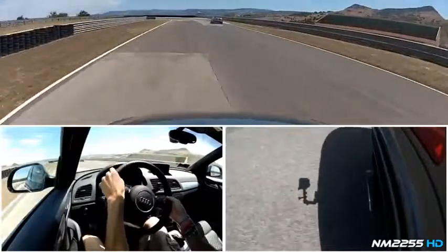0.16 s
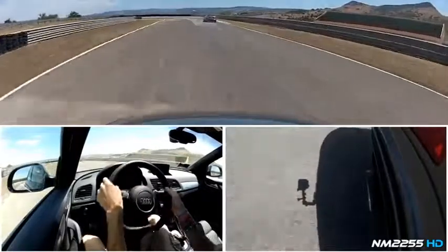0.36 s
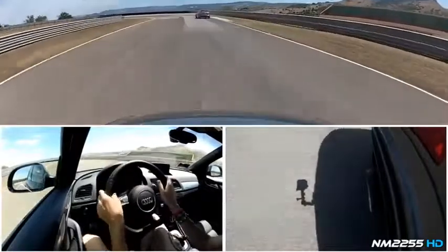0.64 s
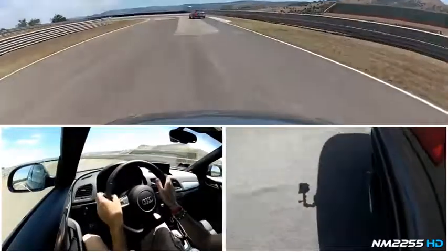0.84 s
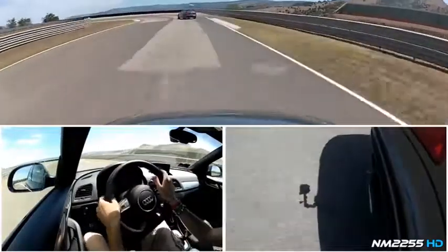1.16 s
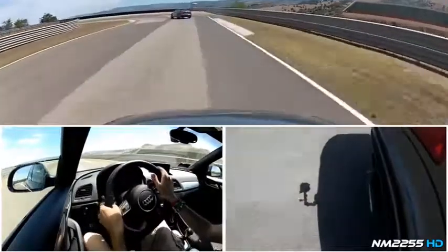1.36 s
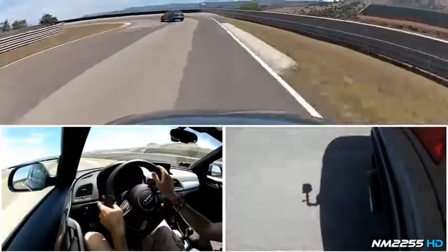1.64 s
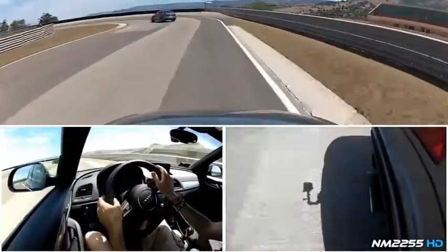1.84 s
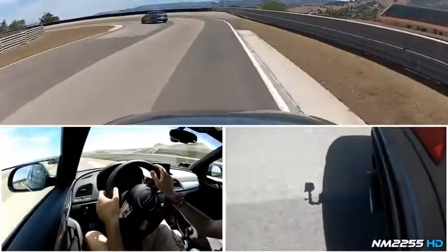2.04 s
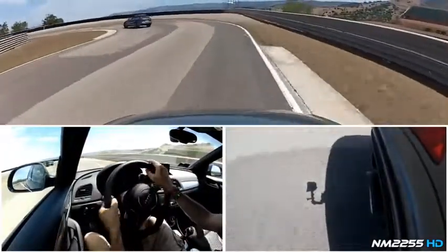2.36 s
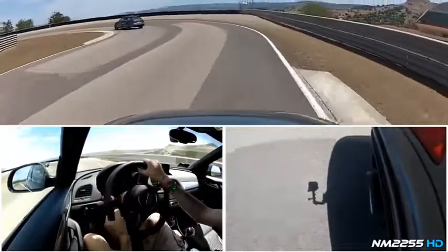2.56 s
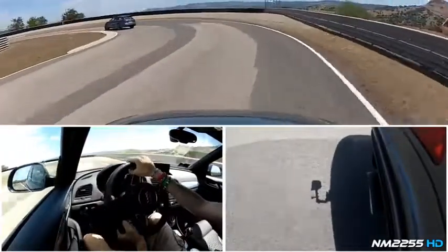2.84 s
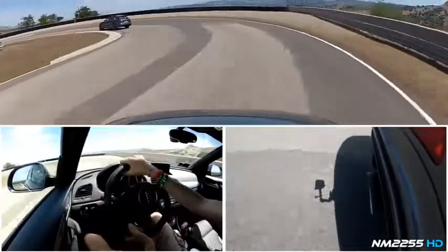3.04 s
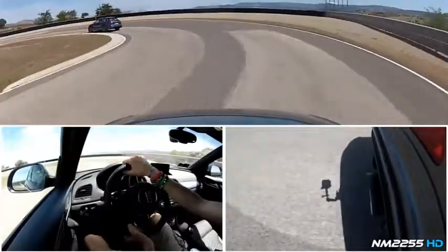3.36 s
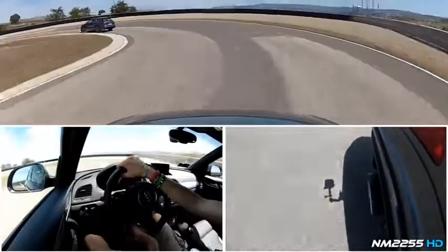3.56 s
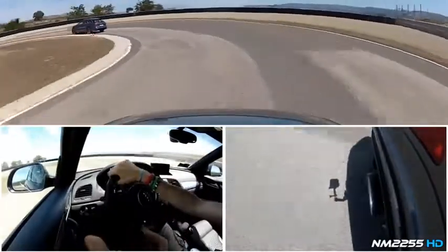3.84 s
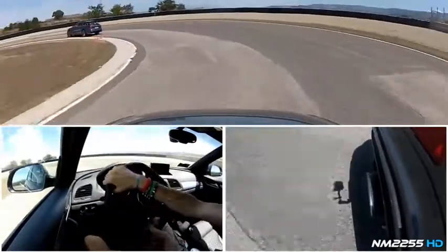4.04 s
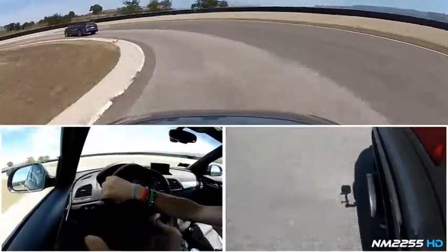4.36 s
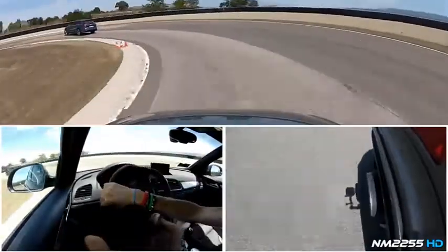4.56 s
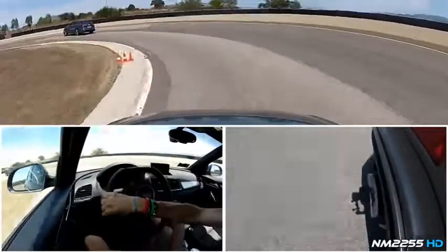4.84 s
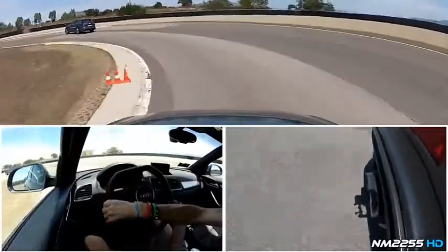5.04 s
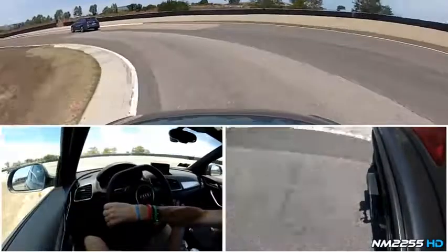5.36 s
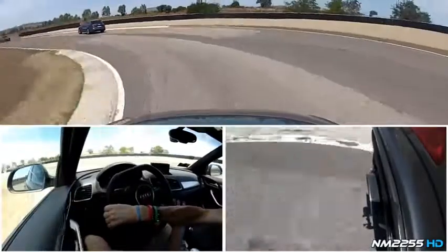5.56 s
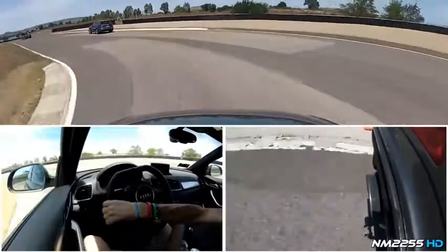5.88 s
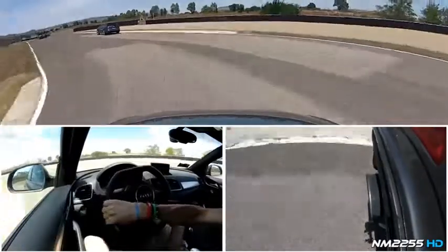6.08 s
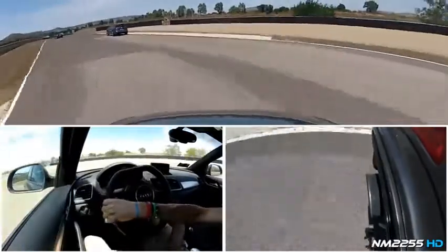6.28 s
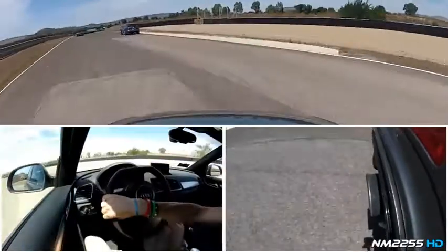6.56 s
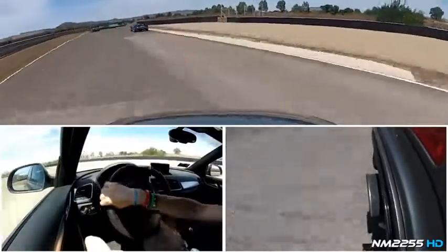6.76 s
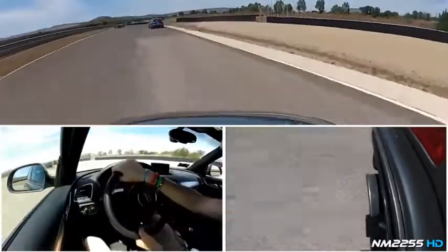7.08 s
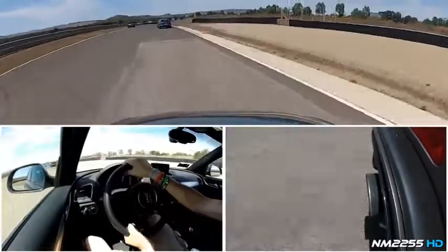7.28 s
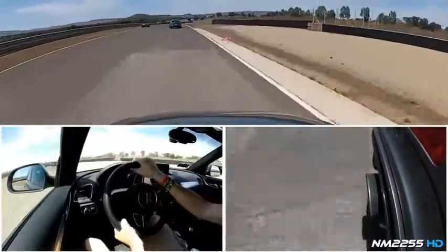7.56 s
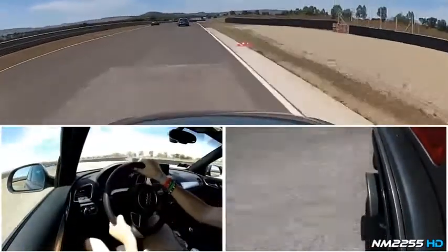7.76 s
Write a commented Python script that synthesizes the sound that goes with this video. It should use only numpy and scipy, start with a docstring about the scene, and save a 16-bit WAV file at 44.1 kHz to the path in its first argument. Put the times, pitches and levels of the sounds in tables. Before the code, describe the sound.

From beside the exhaust of a car lapping a track, a brief hard engine roar drops into uneven burbling. Two throttle blips follow with a cluster of sharp bangs. The car coasts more quietly over tyre noise and buffeting wind, then the throttle reopens with a faint turbo whistle and the engine pulls hard, growling and slowly rising in pitch.

```python
"""A turbocharged five-cylinder car at full throttle on a race track, heard near its tailpipe.
Then a lift, two downshift blips with exhaust pops, a coast through the corner and a hard pull out.
Firing pulses give the note, turbulent gas the rasp and hiss, fuel popping in the pipe the bangs.
Tyre roar and wind run underneath; gain control ducks the whole mix when the engine is loud."""
import sys
import numpy as np
from scipy import signal
from scipy.fft import rfft, irfft
from scipy.io import wavfile
from scipy.ndimage import uniform_filter1d, map_coordinates

SR = 44100
rng = np.random.default_rng(int(sys.argv[2]) if len(sys.argv) > 2 else 0)


def int16_out(signal):
    """Quantize to a 16-bit WAV file."""
    q = np.round(np.clip(np.atleast_2d(signal).T, -1, 1) * 32767)
    wavfile.write(sys.argv[1], SR, q.astype(np.int16))


N = 349266
TIME_S = np.arange(N) / SR
CYLINDERS, REFERENCE_FIRING_HZ = 5, 200

# tyres and airflow through braking, corner and exit: time_s, tyre_db, wind_db
ROAD_LEVELS = [(0, -46, -29), (1.25, -28.5, -30), (1.8, -29, -38), (3.1, -33, -38), (4.3, -33, -41.5),
               (5.1, -34, -32), (7.92, -31.5, -36)]
# tyre noise spectrum: freq_hz, gain_db
TYRE_SPECTRUM = [(100, 4), (230, 3.5), (340, 1), (500, -9), (650, -7), (1050, -3.5), (1330, -13.5),
                 (1800, -14.5), (2200, -22), (3400, -31.5), (5700, -37), (7200, -52), (14000, -81)]
# bodywork resonances: freq_hz, width_hz, gain_db
BODY_BANDS = [(265, 17, -0.5), (668, 38, -1), (917, 28, -3.5), (1800, 33, -33), (2950, 148, 9.5)]
# ragged burning after a lift: start_s, hold_s, level_db
BURBLE_SPELLS = [(0.814, .34, -25), (2.13, 0.16, -25), (2.7, 0.43, -30)]
# whole exhaust under burble: freq_hz, gain_db, t60_s
BURBLE_MODES = [(71.5, 2, 0.25), (196, -1, .04), (285, 0, 0.075), (420, -10.5, 0.08), (690, -12, 0.11),
                (843, -10.5, 0.13)]
# fuel popping in the pipe: start_s, boom_db, ring_db, crack_db
POP_EVENTS = [(0.592, -12, -18, -34), (0.951, -15, -20, -52), (.983, -19, -25, -56), (1.072, -24, -14, -48),
              (1.168, -16, -32, -52), (1.522, -21, -26, -52), (1.872, -21, -19, -40),
              (2.084, -26, -5.5, -32), (2.113, -16, -3, -29), (2.129, -10.5, -6, -38),
              (2.307, -12.5, -36, -45), (2.585, -3.5, -2, -50), (2.609, -6, -4.5, -31),
              (2.646, -6.5, -8.5, -60), (2.743, -7, -37, -37), (2.765, -11, -28, -46),
              (3.534, -22, -18.5, -37), (4.39, -23, -27, -54), (5.8, -22, -14.5, -50),
              (6.099, -17, -25, -42)]
# silencer boom: freq_hz, gain_db, t60_s
SILENCER_MODES = [(52, -2, 0.066), (81.5, 2.5, 0.085)]
# tailpipe ring: freq_hz, gain_db, t60_s
TAILPIPE_MODES = [(222, -6.5, 0.037), (393, -10, 0.093), (432, -7.5, 0.083), (890, -39, .02)]
# gas rasp spectrum: freq_hz, gain_db
RASP_SPECTRUM = [(100, -15.5), (250, -5.5), (330, -12), (430, 0.5), (570, 1.5), (690, -1), (1130, -2),
                 (1450, -11), (1800, -10), (2200, -27), (4000, -35), (7000, -40), (14000, -55)]
# gas hiss spectrum: freq_hz, gain_db
HISS_SPECTRUM = [(1500, -15), (2600, 10.5), (3300, 2), (3900, 9.5), (4800, 1.5), (5700, 1), (6900, -6),
                 (8600, -6), (9400, -14), (10500, -10), (12300, -11), (14800, -20)]
# outlet resonance: freq_hz, width_hz, gain_db
OUTLET_BANDS = [(760, 70, -1)]
# silencer chambers: freq_hz, width_hz, gain_db
CHAMBER_BANDS = [(400, 130, 7.5), (960, 450, -3), (1600, 110, -6.5), (2270, 90, -5.5)]
# steel shell resonances: freq_hz, width_hz, gain_db
SHELL_BANDS = [(2050, 310, 0), (2790, 49, 0.5), (3034, 170, 10.5), (3480, 100, 3), (3740, 59, -5),
               (3970, 100, 5), (5360, 99, -7)]
# turbo plumbing resonances: freq_hz, width_hz, gain_db
TURBO_BANDS = [(3880, 710, -14), (5530, 120, -8.5), (10700, 340, 1)]
# body of the note, unequal cylinders filling in between firing harmonics: cycle_order, gain_db
NOTE_ORDERS = [(1, -18), (2, -12.5), (3, -20), (4, -16), (5, 1), (6, -20), (7, -18.5), (8, -16), (9, -25)]
# steep front of each pulse: cycle_order, gain_db
PULSE_EDGE_ORDERS = [(10, -3.5), (11, -18), (12, -11), (13, -7), (14, -27), (15, -6), (16, -15.5), (17, -1),
                     (18, 6)]
# tailpipe resonance curve: freq_hz, gain_db
PIPE_RESPONSE = [(300, 10), (360, 4), (425, 15), (480, 6.5), (545, 3.5), (640, -11), (1200, -13)]
# engine speed: time_s, firing_hz
ENGINE_SPEED = [(0.0, 202.2), (0.53, 212.3), (0.7, 207), (0.87, 210), (1.03, 201.5), (1.2, 199.5),
                (1.5, 182.7), (1.88, 170), (2.1, 199.5), (2.37, 183), (2.59, 217), (2.8, 202), (3.15, 169),
                (3.75, 168.9), (4.55, 161), (5.5, 162.2), (6.25, 169.2), (6.68, 176.2), (6.9, 182),
                (7.08, 179.8), (7.92, 203.6)]
# throttle presses, and the engine note lingering after a lift; relative levels at the reference rate:
# start_s, rise_s, hold_s, fall_s, note_db, edge_db, rasp_db, hiss_db
ENGINE_SWELLS = [(-0.2, .1, .66, .14, -18, -16, -15, -43), (0.583, 0.063, 0.23, .1, -31, -31, -42.5, -84),
                 (1.855, 0.13, .1, 0.066, -34, -22.5, -21.5, -46.5),
                 (2.368, 0.13, 0.056, 0.11, -19.5, -14.5, -30.5, -55.5),
                 (2.67, .13, 0.11, 0.21, -30.5, -57, -56, -79),
                 (4.68, 0.13, 1.46, .2, -35, -35, -26.5, -44.5),
                 (5.704, 0.43, 0.088, 0.058, -37, -30, -17.5, -39.5),
                 (6.154, 0.36, 1.85, .1, -13, -10, -13.5, -42)]


def amp(db):
    """Decibels to gain."""
    return 10 ** (np.asarray(db) / 20)


def unit_rms(x):
    """Scale to rms 1."""
    return x / np.sqrt(np.mean(x ** 2) + 1e-20)


def curves(rows):
    """Table columns interpolated over time."""
    time_s, *columns = np.transpose(rows)
    return [np.interp(TIME_S, time_s, column) for column in columns]


def ramp(start_s, rise_s, hold_s, fall_s):
    """Trapezoid envelope, 0 to 1 to 0."""
    opening = (TIME_S - start_s) / rise_s
    closing = 1 - (TIME_S - start_s - rise_s - hold_s) / fall_s
    return np.clip(np.minimum(opening, closing), 0, 1)


def wander(rate_hz):
    """Smooth random drift, rms 1, rolled off above rate_hz."""
    white = rng.standard_normal(N // 32 + 2)
    hz = np.fft.rfftfreq(len(white), 32 / SR)
    slow = irfft(rfft(white) / (1 + (hz / rate_hz) ** 4), len(white))
    return unit_rms(np.interp(np.arange(N) / 32, np.arange(len(slow)), slow))


def response(spectrum, hz):
    """Gain of a spectrum at hz."""
    freq_hz, gain_db = np.transpose(spectrum)
    return amp(np.interp(np.log(hz + 1), np.log(freq_hz), gain_db))


def coloured(x, spectrum):
    """Filter by a spectrum, rolled off below its first point; rms 1."""
    hz = np.fft.rfftfreq(N, 1 / SR)
    low_cut = np.minimum(hz / spectrum[0][0], 1) ** 2
    return unit_rms(irfft(rfft(x) * response(spectrum, hz) * low_cut, N))


def resonances(x, bands):
    """Parallel band-pass resonators."""
    return sum(amp(db) * signal.lfilter(*signal.iirpeak(hz, hz / width_hz, fs=SR), x)
               for hz, width_hz, db in bands)


def ringing(modes):
    """Damped modes after one pressure kick."""
    t = np.arange(SR // 4) / SR
    return sum(amp(db - 60 * t / t60_s) * np.sin(2 * np.pi * hz * t) for hz, db, t60_s in modes)


def road_and_wind():
    """Tyres roar on coarse asphalt and stir the bodywork; eddies buffet the microphone."""
    tyre_db, wind_db = curves(ROAD_LEVELS)
    tyres = coloured(amp(0.76 * wander(12)) * rng.standard_normal(N), TYRE_SPECTRUM)
    tyres = unit_rms(tyres + resonances(tyres, BODY_BANDS))
    wind = coloured(rng.standard_normal(N),
                    spectrum=[(26, -2.5), (36, -1), (70, -5.5), (130, -5.5), (300, -15.5), (4000, -90)])
    gust_db = 1 + 3.6 * np.tanh(wander(9.5))
    return amp(tyre_db) * tyres + amp(wind_db + gust_db) * wind


def turbo_spool(peak_s=4.8, spread_s=0.53, peak_db=-55, pitch_hz=3080, width_hz=82):
    """The turbo draws air with a faint whistle as the throttle reopens."""
    whistle = unit_rms(resonances(rng.standard_normal(N), [(pitch_hz, width_hz, 0)]))
    return amp(peak_db) * np.exp(-((TIME_S - peak_s) / spread_s) ** 2) * whistle


def burble(cycles, rise_s=0.062, fall_s=0.12):
    """After a lift, charges burn unevenly and thump the exhaust, loping twice a cycle."""
    fired = np.diff(np.floor(CYLINDERS * cycles), prepend=0) > 0
    lope = np.cos(2 * np.pi * 2 * cycles)
    kicks = fired * (lope + rng.uniform(-1.93, 1, N))
    spells = sum(amp(db) * ramp(start_s, rise_s, hold_s, fall_s) for start_s, hold_s, db in BURBLE_SPELLS)
    return spells * unit_rms(signal.oaconvolve(kicks, ringing(BURBLE_MODES))[:N])


def pops(crack_rise_s=0.0012, crack_t60_s=0.031, crack_cutoff_hz=700):
    """Fuel pops in the pipe: a short crack, a tailpipe ring and a silencer boom."""
    out = np.zeros(N + SR)
    boom, ring = ringing(SILENCER_MODES), ringing(TAILPIPE_MODES)
    t = np.arange(len(boom)) / SR
    lowpass = signal.butter(1, crack_cutoff_hz, fs=SR)
    for start_s, boom_db, ring_db, crack_db in POP_EVENTS:
        grit = unit_rms(signal.lfilter(*lowpass, rng.standard_normal(len(t))))
        crack = amp(crack_db - 60 * t / crack_t60_s) * (1 - np.exp(-t / crack_rise_s)) * grit
        out[int(start_s * SR) + np.arange(len(t))] += amp(boom_db) * boom + amp(ring_db) * ring + crack
    return out[:N]


def gas_rush(cycles, firing_hz, rasp_db, hiss_db,
             buzz_from_hz=192, buzz_span_hz=2.2, roar_from_db=-24, whistle_from_db=-63):
    """Turbulent gas leaves in one puff per firing, one cylinder blowing harder than the rest."""
    puffs = 1 - 0.085 * np.cos(2 * np.pi * CYLINDERS * cycles) + 0.028 * np.cos(2 * np.pi * cycles)
    # growl: part of the turbulence recurs every cycle
    pattern = rng.standard_normal(1024)
    recurring = map_coordinates(pattern, [cycles % 1 * len(pattern)], order=3, mode="grid-wrap")
    flow = rng.standard_normal(N) + 0.67 * recurring
    rasp = coloured(puffs * amp(0.8 * wander(30)) * flow, RASP_SPECTRUM)
    # gentle flow sounds hollow, strong flow roars at the outlet
    strong = 1 / (1 + amp(2 * (roar_from_db - rasp_db)))
    roar = strong * resonances(rasp, OUTLET_BANDS) + (1 - strong) * resonances(rasp, CHAMBER_BANDS)
    buzz_gain = amp(3) / (1 + np.exp((buzz_from_hz - firing_hz) / buzz_span_hz))
    buzz = buzz_gain * resonances(rasp, SHELL_BANDS)
    hiss = coloured((1 + 1.6 * puffs) * amp(0.93 * wander(30)) * rng.standard_normal(N), HISS_SPECTRUM)
    # the turbo whistle comes in with the hiss, then blends into strong flow
    whistle_gain = (1.3 - 0.63 * strong) / (1 + amp(2 * (whistle_from_db - hiss_db)))
    whistle = whistle_gain * resonances(hiss, TURBO_BANDS)
    return amp(rasp_db - 1) * (rasp + roar + buzz) + amp(hiss_db + 6.5) * (hiss + whistle)


def order_tone(order, cycles, firing_waver, between_waver):
    """One engine order; firing harmonics and the orders between waver by separate depths."""
    waver, phase = (firing_waver, 0) if order % CYLINDERS == 0 else (between_waver, rng.random())
    return -np.sqrt(2) * (1 + waver * wander(28)) * np.cos(2 * np.pi * (order * cycles + phase))


def exhaust_note(cycles, firing_hz, note_db, edge_db, standing_wave_hz=497, half_width_hz=24):
    """Firing pulses as engine orders; the upper ones swell passing through the pipe resonance."""
    note = sum(amp(note_db + db) * order_tone(order, cycles, 0.06, 0.36) for order, db in NOTE_ORDERS)
    edge_gain = amp(edge_db) / response(PIPE_RESPONSE, 2 * firing_hz)
    jittered = cycles + 0.0018 * wander(45)
    for order, db in PULSE_EDGE_ORDERS:
        pipe_gain = response(PIPE_RESPONSE, order * firing_hz / CYLINDERS)
        note += edge_gain * amp(db) * pipe_gain * order_tone(order, jittered, 0.12, 0.28)
    # even at light load, the third firing harmonic hums on meeting a standing wave
    hum = order_tone(3 * CYLINDERS, jittered, 0.2, 0)
    coupling = 1 / (1 + ((3 * firing_hz - standing_wave_hz) / half_width_hz) ** 4)
    hum_db = np.minimum(note_db, -35) - 8
    return note + amp(hum_db) * coupling * hum


def layer_db(firing_hz, swells_db, swell_db_per_oct, ramp_power, coast_db, coast_db_per_oct):
    """Level of one exhaust layer: swell plus coasting power, both following the revs."""
    octaves = np.log2(firing_hz / REFERENCE_FIRING_HZ)
    swelling = sum((amp(db) * ramp(*swell[:4]) ** ramp_power) ** 2
                   for swell, db in zip(ENGINE_SWELLS, swells_db))
    coasting = amp(coast_db + coast_db_per_oct * octaves) ** 2
    return 10 * np.log10(swelling * amp(swell_db_per_oct * octaves) ** 2 + coasting)


def scene():
    """One crankshaft times note, gas rush and burble; turbo, pops, tyres and wind join them."""
    firing_hz = curves(ENGINE_SPEED)[0] * (1 + 0.002 * wander(5))
    cycles = np.cumsum(firing_hz) / SR / CYLINDERS
    notes, edges, rasps, hisses = np.transpose(ENGINE_SWELLS)[4:]
    note_db = layer_db(firing_hz, notes, 4.5, ramp_power=0.68, coast_db=-31.5, coast_db_per_oct=32.5)
    edge_db = layer_db(firing_hz, edges, 45, ramp_power=1.1, coast_db=-47, coast_db_per_oct=14)
    rasp_db = layer_db(firing_hz, rasps, 29.5, ramp_power=1.82, coast_db=-43.5, coast_db_per_oct=12)
    hiss_db = layer_db(firing_hz, hisses, 43.5, ramp_power=1.46, coast_db=-70, coast_db_per_oct=-17)
    note = exhaust_note(cycles, firing_hz, note_db, edge_db)
    rush = gas_rush(cycles, firing_hz, rasp_db, hiss_db)
    return (note + rush + turbo_spool() + burble(cycles) + pops() + road_and_wind())[None]


def gain_control(x, threshold_db=-14.5, ratio=6, attack_s=0.02, recovery_db_per_s=32):
    """Holds loud passages down; road noise swells back after them."""
    pole = np.exp(-1 / (attack_s * SR))
    power_db = 10 * np.log10(signal.lfilter([1 - pole], [1, -pole], x[0] ** 2) + 1e-12)
    recovery_db = recovery_db_per_s * TIME_S
    held_db = np.maximum.accumulate(power_db + recovery_db) - recovery_db
    over_db = np.maximum(held_db - threshold_db, 0)
    return x * amp(-(1 - 1 / ratio) * uniform_filter1d(over_db, size=900))


def record(dry, low_cut_hz=14, ceiling=0.92, high_cut_hz=15100):
    """Microphone chain: low cut, gain control, soft clip, high cut."""
    lean = signal.lfilter(*signal.butter(1, low_cut_hz, "highpass", fs=SR), dry)
    rounded = ceiling * np.tanh(gain_control(lean) / ceiling)
    lowpass = signal.firwin(1023, high_cut_hz, window=("kaiser", 9), fs=SR)
    return signal.oaconvolve(rounded, lowpass[None], "same")


dry = scene()
out = record(dry)
int16_out(out)
```